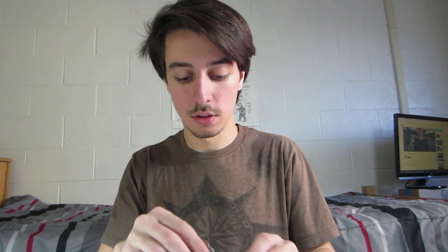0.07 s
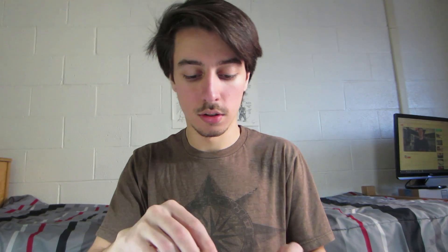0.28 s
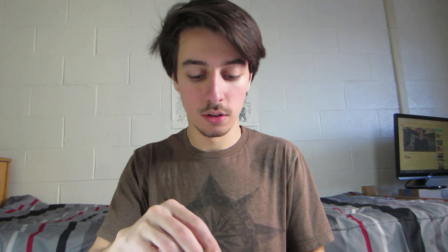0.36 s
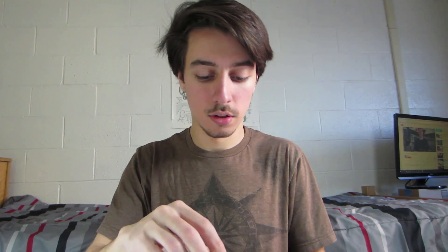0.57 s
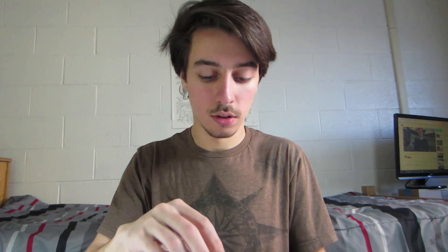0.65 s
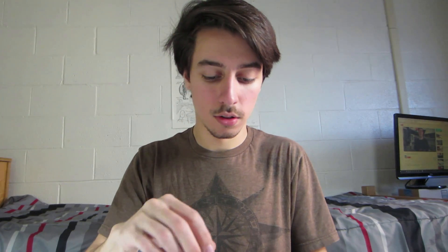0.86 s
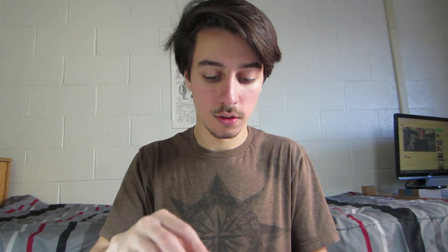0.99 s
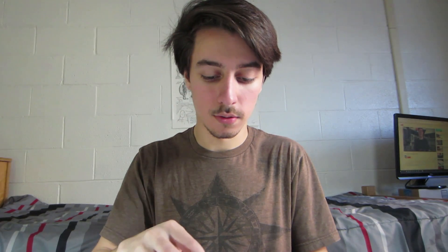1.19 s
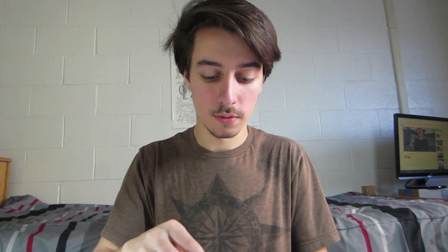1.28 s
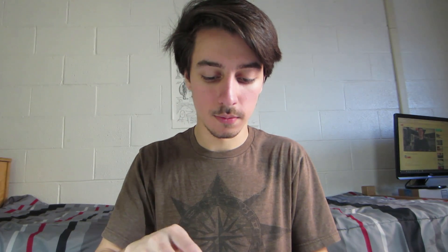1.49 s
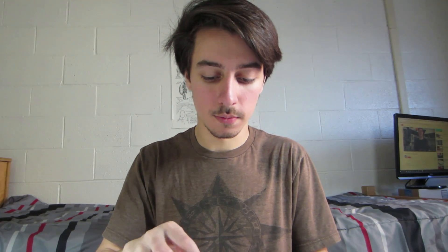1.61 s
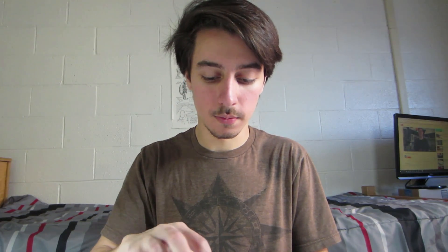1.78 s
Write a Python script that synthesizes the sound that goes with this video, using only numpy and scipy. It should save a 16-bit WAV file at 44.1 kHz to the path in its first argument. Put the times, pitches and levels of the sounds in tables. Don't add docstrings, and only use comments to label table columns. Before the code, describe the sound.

Coins drop into a hollow plastic hopper, close to the microphone. After faint touches, a loud clattering burst at 0.2-0.35 seconds brings sharp clacks, boxy thuds and bright clinks. More hits and a high ring follow around 0.5-0.65, then a strong knock at 0.71 with rattling to 0.85. After near quiet, softer sliding and taps come at 1.15-1.4, a last light tick at 1.5. Faint room hum and short reverberation.

```python
import sys
import numpy as np
from scipy import signal
from scipy.fft import rfft, irfft
from scipy.io import wavfile
from scipy.ndimage import uniform_filter1d

SR = 44100
rng = np.random.default_rng(int(sys.argv[2]) if len(sys.argv) > 2 else 0)


def wrap_up_sound(samples):
    columns = np.atleast_2d(samples).T
    tamed = np.clip(columns, -1, 1)
    steps = np.round(tamed * 32767).astype(np.int16)
    wavfile.write(sys.argv[1], SR, steps)


def elevation(decibels):
    levels = np.asarray(decibels, float)
    return 10 ** (levels / 20)


N = 81585
STRIKE = 6000


def evened(x):
    return x / np.sqrt(np.mean(x ** 2) + 1e-20)


def read(points, hz):
    f, value = np.transpose(points)
    return np.interp(np.log(hz + 1), np.log(f + 1), value)


def colour(x, points):
    size = x.shape[-1]
    gain = elevation(read(points, np.fft.rfftfreq(size, 1 / SR)))
    return irfft(rfft(x) * gain, size)


# (frequency [Hz], level [dB per Hz])
AIR = [(25, -4.5), (110, -4), (310, 0.5), (1000, -11.5), (2200, -26), (3000, -38.5), (5700, -38.5),
       (6700, -64.5)]
# (frequency [Hz], left-right likeness [0-1])
LIKENESS = [(30, .9), (200, 0.99), (900, 0.67), (3000, 0.15), (6000, 0.26)]


def air():
    level_db, patch_db = -53, 0.31
    hz = np.fft.rfftfreq(1024, 1 / SR)
    a, b, c, d, patches = rng.standard_normal((N // 256 + 5, 513, 5)).T
    patches = uniform_filter1d(patches, 6, 0)
    patches = evened(uniform_filter1d(patches, 10, 1))
    same = np.clip(read(LIKENESS, hz), -1, 1)[:, None]
    left = a + 1j * b
    right = same * left + np.sqrt(1 - same ** 2) * (c + 1j * d)
    spectrum_db = read(list(AIR) + [(9000, -100.5)], hz)[:, None]
    z = np.array([left, right]) * elevation(spectrum_db + patch_db * patches)
    return elevation(level_db) * evened(signal.istft(z, nperseg=1024, noverlap=768)[1][:, :N])


# (frequency [Hz], level [dB rms])
TONES = [(590, -65.5), (7880, -87)]


def whine():
    t = np.arange(N) / SR
    waver_db = 1.6 * evened(uniform_filter1d(rng.standard_normal(N), 1500))
    tones = sum(np.sqrt(2) * elevation(db) * np.sin(2 * np.pi * hz * t) for hz, db in TONES)
    return elevation(waver_db) * tones


# (frequency [Hz], level [dB per Hz])
WALL = [(1000, -9.5), (1900, -5), (2500, -6), (3600, -12), (5200, -7), (6800, -14), (7600, 8.5)]


def crack(tick):
    t60_s, tick_db, tick_t60_s = 0.029, 7, 0.004
    t = np.arange(STRIKE) / SR
    noise = colour(rng.standard_normal(STRIKE), [(500, -39.5)] + list(WALL) + [(9500, -6), (13000, -7.5)])
    out = noise * (elevation(-60 * t / t60_s) + tick * elevation(tick_db - 60 * t / tick_t60_s))
    return out / np.sqrt(np.mean(out[:100] ** 2))


def ring(modes, spread, spread_db, damping):
    t = np.arange(STRIKE)[:, None] / SR
    hz, db, t60 = np.transpose(modes)
    level, pitch, phase = rng.standard_normal((3, len(hz)))
    decay = elevation(db + spread_db * level - 60 * t / (t60 * damping))
    out = (decay * np.sin(2 * np.pi * hz * (1 + spread * pitch) * t + 2 * phase)).sum(1)
    return out / np.sqrt(np.mean(out[:300] ** 2))


# (frequency [Hz], level [dB], decay t60 [s])
BOX = [(38.03, -10, 0.076), (71, -6, 0.079), (130.7, 2, 0.083), (161.6, -8.5, .1), (225, -1, 0.16),
       (277.2, -2.5, 0.15), (359.8, 1.5, 0.088), (406, -2, 0.073), (502, -2.5, 0.085), (600.5, 0, 0.034)]
# (frequency [Hz], level [dB], decay t60 [s])
HOLLOW = [(688, -1.5, 0.061), (812, 7.5, 0.035), (894, 5.5, 0.054), (972.6, 1, 0.077), (1097, -6, 0.065),
          (1262, 4, 0.016), (1430, -6.5, 0.033)]
# (frequency [Hz], level [dB], decay t60 [s])
COINS = [(10000, -2, 0.017), (9700, -8.5, 0.01), (10340, -13, .06), (10600, -11.5, 0.078),
         (11190, -2, 0.018), (10770, -12, 0.1006), (11080, -7.5, .09), (11100, -4.5, 0.017),
         (12000, -13.5, 0.035), (12000, -2, 0.041), (13400, 9, 0.017)]
RISE_S = [0.00045, 0.0043, 0.00074, 0.00097]


def strikes(damping, tick=False):
    rise = 1 - np.exp(-np.arange(STRIKE) / SR / np.array(RISE_S)[:, None])
    heard = []
    for _ in range(2):
        wall = crack(tick)
        box = ring(BOX, 0.02, 2.1, 0.84)
        hollow = ring(HOLLOW, 0.015, 4.1, 0.85)
        coins = ring(COINS, 0.015, 3.0, damping)
        heard.append(rise * np.array([wall, box, hollow, coins]))
    return np.vstack(heard)


BLOW_TRIM_DB = [4.5, -5.5, -5, 1.5]


def landed(events):
    lag_s, damping = 0.0008, 0.35
    out = np.zeros((8, N + STRIKE))
    for s, *db in events:
        at = round((s + lag_s) * SR)
        level = np.tile(elevation(np.add(db, BLOW_TRIM_DB)), 2)[:, None]
        out[:, at:at + STRIKE] += level * strikes(damping, tick=True)
    return out[:, :N]


# (time [s], crack [dB], hollow [dB], coin ring [dB])
TOUCHES = [(0.03, -58, -77, -58), (.095, -64, -84, -63), (0.116, -56, -77, -46.5), (.129, -52, -68, -46),
           (.143, -69, -55, -62), (.172, -53.5, -56, -44.5), (.218, -40, -43.5, -36.5),
           (.232, -36, -41, -38.5), (.24, -35, -45, -41), (.252, -38.5, -44.5, -40),
           (.261, -40.5, -49, -42), (.308, -44.5, -42.5, -42), (.798, -48, -68, -64), (.82, -61, -69, -45),
           (0.825, -64, -57.5, -43), (1.152, -77, -41, -73.5), (1.166, -62, -34, -71),
           (1.184, -41.5, -38, -49), (1.395, -60, -53.5, -78), (1.406, -57, -42, -77),
           (1.416, -55, -64, -53), (1.425, -53, -53, -52)]


def touches():
    return landed([(s, wall, -99, hollow, coins) for s, wall, hollow, coins in TOUCHES])


# (start [s], length [s], level [dB], box share [dB], coin share [dB])
SLIDES = [(0.055, 0.027, -69, -9, -5), (0.088, 0.079, -64.5, -2, 8.5), (0.206, 0.0121, -36.5, 12.5, -10.5),
          (0.223, 0.023, -36.5, -2, -1), (0.285, 0.067, -41, 4, -4), (0.486, 0.044, -42, 2.5, 2.5),
          (0.541, 0.054, -44.5, -5.5, -30), (0.626, 0.014, -63, 16.5, 4.5), (0.716, 0.046, -42.5, 7.5, -10),
          (0.768, 0.03, -48, 4, -19.5), (0.815, 0.051, -43, 2, -13), (1.124, 0.016, -65, 2, -14),
          (1.147, 0.037, -48, 1, -36), (1.178, 0.13, -45.5, -2.5, -12.5), (1.277, 0.018, -47.5, 0.5, 6.5),
          (1.316, 0.112, -68.5, 11.5, -24), (1.406, 0.057, -51, -1.5, -33), (1.512, 0.0073, -57.5, 0, -32)]


def slides():
    rise_share, fall_s = 0.18, 0.019
    rattle_per_s, jingle_per_s = 2400, 450
    t, drive = np.arange(N) / SR, np.zeros((4, N))
    for s, length, db, box_db, coin_db in SLIDES:
        rise = np.clip((t - s) / (rise_share * length), 0, 1)
        shape = rise * np.exp(-np.maximum(t - s - length, 0) / fall_s)
        scrape_db = -0.5 + 0.13 * box_db + 0.13 * coin_db
        drive += shape * elevation(db + np.array([[scrape_db], [box_db], [0], [coin_db]]))
    chance, spot = rng.random(N), rng.integers(0, 5, N)
    size = elevation(3.2 * np.minimum(rng.exponential(1, N), 4)) * rng.choice([-1., 1.], N)
    rates = np.tile([rattle_per_s, rattle_per_s, rattle_per_s, jingle_per_s], 2)[:, None]
    contacts = np.array([evened(row) for row in size * (chance < rates / SR)])
    out, drive = np.zeros((8, N)), np.tile(drive, (2, 1))
    for k in range(5):
        body = strikes(0.31)
        body /= np.linalg.norm(body, axis=1)[:, None]
        out += signal.fftconvolve(drive * contacts * (spot == k), body, axes=1)[:, :N]
    return out


# (time [s], frequency [Hz], level [dB], decay t60 [s])
NOTES = [
    (.172, 10600, -38, 0.24),
    (.205, 10770, -41, .1),
    (.24, 10870, -20.5, 0.11),
    (0.296, 11080, -28.5, 0.14),
    (.297, 12000, -53, 0.085),
    (.512, 10700, -19.5, 0.053),
    (1.283, 11200, -52, 0.079),
    (.492, 947.4, -28.5, 0.18),
    (.572, 963.3, -26, 0.17),
    (0.717, 218.5, -26, 0.23),
]


def notes():
    rise_s, caught_s = 0.011, 0.05
    s, hz, db, t60 = np.transpose(NOTES)[:, :, None]
    t = np.maximum(np.arange(N) / SR - s, 0)
    envelope = (1 - np.exp(-t / rise_s)) * elevation(db - 60 * t / t60) * np.exp(-(t / caught_s) ** 4)
    each = envelope * np.sin(2 * np.pi * hz * t)
    wall, box, hollow, coins = np.zeros(N), each[-1], each[-3:-1].sum(0), each[:-3].sum(0)
    return np.array([wall, box, hollow, coins])


# (time [s], crack [dB], box thud [dB], hollow [dB], coin ring [dB])
BLOWS = [(0.2034, -17, -11.5, -24.5, -49), (0.2124, -46.5, -26, -26, -43.5),
         (0.2288, -28.5, -21, -25.5, -28), (0.2358, -20, -14.5, -31, -56.5), (0.2444, -31.5, -38, -49, -52),
         (0.2704, -29.5, -23, -44, -38), (0.2957, -34.5, -24, -29.5, -32.5),
         (0.3366, -36, -34.5, -31, -29.5), (0.4918, -36, -53, -27, -30), (0.5043, -33.5, -25.5, -44, -33),
         (0.5684, -64, -56, -34.5, -35.5), (0.5764, -46, -55, -29, -59.5), (0.6035, -40, -33.5, -35, -38.5),
         (0.6116, -46, -36.5, -60, -63), (0.634, -78, -47, -50.5, -58), (0.7123, -23.5, -16, -30, -29),
         (0.7204, -34, -19, -30.5, -66.5), (0.7846, -34, -47, -34, -59), (0.7909, -49, -36, -34.5, -69),
         (0.8101, -35, -48, -32, -35), (0.903, -73, -38.5, -62, -75), (1.2715, -35.5, -37, -41, -47),
         (1.2844, -62, -35.5, -31.5, -35.5), (1.2974, -37.5, -55, -33.5, -46),
         (1.4985, -56, -57, -41, -47.5)]


def blows():
    return landed(BLOWS)


# (frequency [Hz], decay t60 [s])
ROOM_T60 = [(150, 0.3), (1000, 0.39), (4000, 0.22), (11000, 0.17)]


def room(x):
    taps = np.zeros((2, SR // 2))
    at = np.arange(200, SR // 2 - 20, 20) + rng.integers(0, 20, (2, (SR // 2 - 201) // 20))
    np.put_along_axis(taps, at, rng.choice([-1., 1.], at.shape), 1)
    hz, t, z = signal.stft(taps, SR, nperseg=256)
    decay = elevation(-60 * t / read(ROOM_T60, hz)[:, None])
    tail = signal.istft(z * decay, SR, nperseg=256)[1]
    return signal.fftconvolve(x[None], tail / np.linalg.norm(tail[0]), axes=1)[:, :N]


def sooner(x, s):
    return irfft(rfft(x) * np.exp(2j * np.pi * s * np.fft.rfftfreq(N, 1 / SR)), N)


# (start [s], end [s], frequency [Hz])
HOLES = [
    (1.19, 1.29, 4330),
    (1.25, 1.39, 3630),
    (1.32, 1.37, 3200),
    (.33, .37, 3500),
    (.52, .56, 4050),
]


def gate(x):
    floor_db, under_loudest_db, chance_db = -91, -21, 4
    above_hz, hole_hz = 6600, 130
    hz, t, z = signal.stft(x, SR, nperseg=1024)
    bands = np.arange(len(hz)) // 10
    power = np.add.reduceat((np.abs(z) ** 2).mean(0), np.arange(0, len(hz), 10))
    level = 10 * np.log10(power + 1e-20)
    level = level + chance_db * evened(uniform_filter1d(rng.standard_normal(level.shape), size=3))
    high = (hz > above_hz)[:, None]
    loudest = np.where(high, level[bands], -200).max(0)
    edge = np.maximum(floor_db, loudest + under_loudest_db)
    keep = np.where(high, level[bands] > edge, 1.)
    for start, end, centre in HOLES:
        keep *= 1 - (np.abs(hz - centre) < hole_hz)[:, None] * ((t > start) & (t < end))
    return signal.istft(z * keep, SR, nperseg=1024)[1][:, :N]


# (start [s], length [s], depth [dB])
HUSHES = [
    (.017, .012, -25),
    (.082, .008, -25),
    (.184, .0175, -11),
    (.2085, .004, -12),
    (.701, .0085, -35),
    (.767, .016, -9),
    (.789, .007, -12),
    (.802, .007, -12),
    (.815, .004, -8),
    (1.491, .0065, -35),
]


def hush(x):
    above_hz = 2100
    t, fall_db = np.arange(N) / SR, np.zeros(N)
    for s, length, db in HUSHES:
        fall_db += db * ((t > s) & (t < s + length))
    treble = colour(x, [(0.8 * above_hz, -80), (above_hz, 0)])
    return x - treble * (1 - elevation(uniform_filter1d(np.minimum(fall_db, 0), size=60)))


ROOM_DB = [-6, -37.5, -13, -34.5]
PAN_DB = [-2.5, -0.9, 1.5, -1.3]
SIDEWAYS_DB = [-11, -25, -17, -8]
# (frequency [Hz], level [dB])
MIC = [(30, -10), (105, 0), (6800, 0), (7350, -22), (7650, -52), (8400, -50), (8800, -22), (9250, 0),
       (12450, 0), (12950, -26), (14200, -50)]


def scene():
    left_lag_s, duck_db = 1.7e-5, -49
    parts, side = (touches() + slides() + blows()).reshape(2, 4, N)
    parts = parts + notes()
    pan = elevation(np.array(PAN_DB)[:, None] / 2)
    side = (side * elevation(SIDEWAYS_DB)[:, None]).sum(0)
    left = (parts * pan).sum(0) + side
    right = sooner((parts / pan).sum(0), left_lag_s) - side
    reflected = room((parts * elevation(ROOM_DB)[:, None]).sum(0))
    hopper = colour(np.array([left, right]) + reflected, MIC)
    loud = np.abs(uniform_filter1d(hopper[0] ** 2, 1500)) / elevation(2 * duck_db)
    return gate(hopper + air()) + whine() / (1 + loud ** 2)


def low_pass(x):
    return signal.sosfilt(signal.butter(12, 13910, fs=SR, output="sos"), x)


def record(dry):
    mix = hush(dry)
    return low_pass(mix)


dry = scene()
out = record(dry)
wrap_up_sound(out)
```